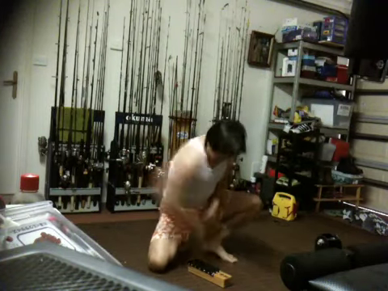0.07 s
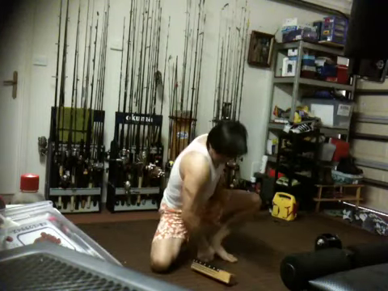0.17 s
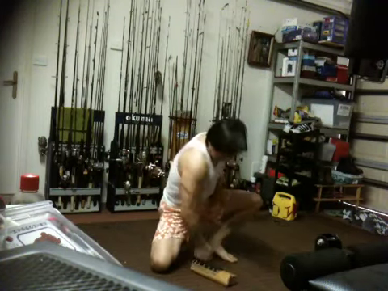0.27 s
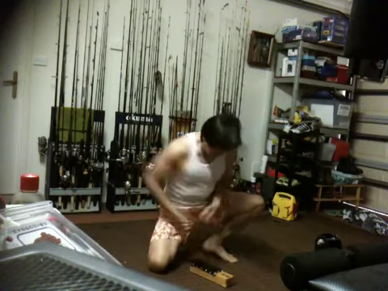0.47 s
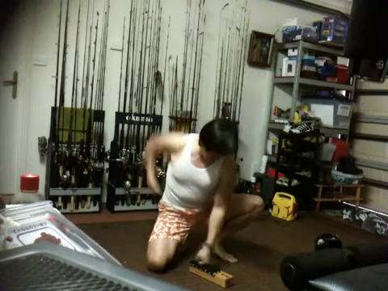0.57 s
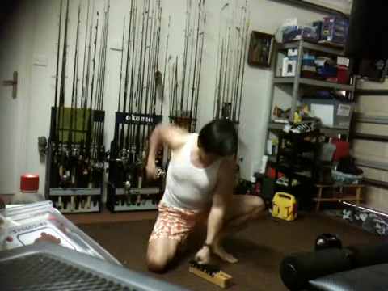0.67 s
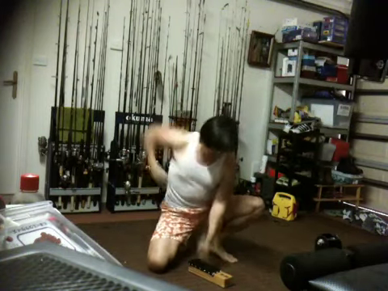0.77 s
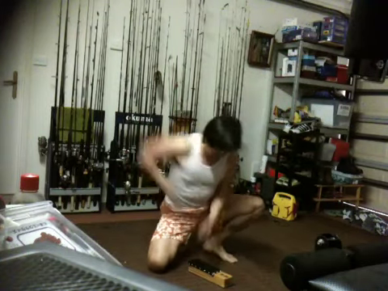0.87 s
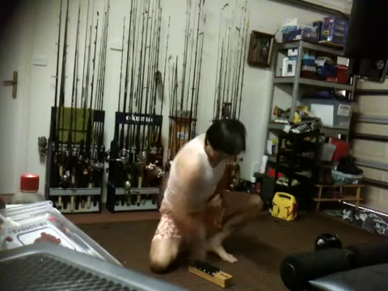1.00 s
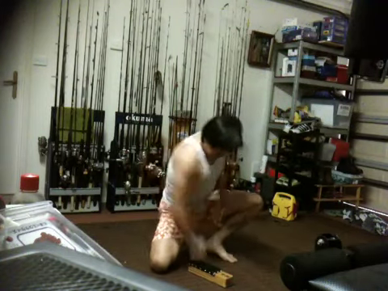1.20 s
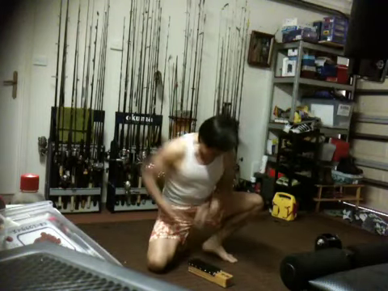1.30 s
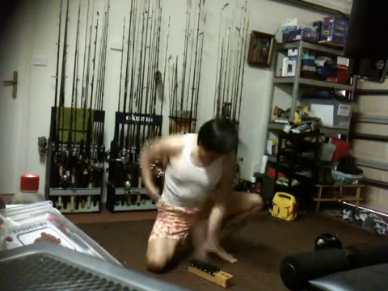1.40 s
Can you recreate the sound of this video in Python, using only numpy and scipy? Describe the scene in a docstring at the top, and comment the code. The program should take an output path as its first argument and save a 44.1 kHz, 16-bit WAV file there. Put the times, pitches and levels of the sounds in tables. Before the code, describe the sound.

An arm smacks a wooden block twice, with a duller thump between, in a small room.

```python
"""Strike training in a small, bare-walled storage room; one microphone, a few metres away.
At first an earlier blow is still dying away, under a soft bump of shifting weight. An arm swishes down
and smacks over a wooden block (0.23 s), is pulled back with a duller thump against the body (0.70 s),
then swishes down and smacks again (1.14 s). One more soft bump follows. The room rings after every
blow, over a faint, steady room noise."""
import sys
import numpy as np
from scipy import signal
from scipy.fft import rfft, irfft
from scipy.io import wavfile

SR = 44100
rng = np.random.default_rng(int(sys.argv[2]) if len(sys.argv) > 2 else 0)


def generate_wav(sig):
    """Save sig (samples, or channels by samples) to the path in sys.argv[1] as 16-bit PCM at SR."""
    pcm = np.round(np.clip(np.atleast_2d(sig).T, -1, 1) * 32767).astype(np.int16)
    wavfile.write(sys.argv[1], SR, pcm)


N = 63945

TOUCH_DECAY_S, SMACK_DECAY_S, TOUCH_DULL_HZ = 0.002913, 0.00233, 1500
BODY_WIDTH_HZ, HOLLOW_WIDTH_HZ, CRACK_WIDTH_HZ = 46, 106, 190
THUD_LAG_S = 0.0037
# Spectrum of smacking skin: f/Hz, level/dB
SMACK_SPECTRUM = [(30, -37), (90, -25.5), (165, -8), (215, -3), (265, -10.5), (400, -6.5), (600, -1),
                  (800, -1.5), (1300, -0.5), (1900, -1.5), (2450, -0.5), (3250, -4.5), (4200, -2),
                  (5700, -4.5), (7300, 0.5), (8500, -6.5), (11400, -16), (12800, -23), (16000, -42)]
# Blows over the block: touch t/s, level/dB; full contact t/s, level/dB; floor thud level/dB;
# then f/Hz, boost/dB for each of body note, hollow note and crack
STRIKE_EVENTS = [(0.2245, -8.5, 0.2298, 1, -24, 515, 4.5, 1036, 6.5, 4010, 5.5),
                 (1.1362, -8.5, 1.1437, -2.7, -36, 317, 6, 1600, 5.5, 4700, 6)]
def strikes():
    """Each strike touches first, lands flat with three resonances, then pushes into the floor."""
    out = np.zeros(N)
    for touch_s, touch_db, smack_s, smack_db, thud_db, *resonances in STRIKE_EVENTS:
        body_hz, body_db, hollow_hz, hollow_db, crack_hz, crack_db = resonances
        peaks = [(body_hz, BODY_WIDTH_HZ, body_db),
                 (hollow_hz, HOLLOW_WIDTH_HZ, hollow_db),
                 (crack_hz, CRACK_WIDTH_HZ, crack_db)]

        def colour(hz):
            """The smack's spectrum with this strike's resonances, in dB."""
            boost_db = sum(db / (1 + ((hz - f) / width) ** 2) for f, width, db in peaks)
            return read(SMACK_SPECTRUM, hz) + boost_db

        dull_click = pulse(lambda hz: colour(hz) - 10 * np.log10(1 + (hz / TOUCH_DULL_HZ) ** 2))
        touch = np.convolve(dull_click, contact(TOUCH_DECAY_S))
        add(out, touch_s, amp(touch_db) * room(touch, wet_db=-1.5))
        smack = np.convolve(pulse(colour), contact(SMACK_DECAY_S))
        add(out, smack_s, amp(smack_db) * room(smack))
        add(out, smack_s + THUD_LAG_S, amp(thud_db) * room(floor_thud(), wet_db=-10))
    return out


def floor_thud(hz=138, decay_s=0.004):
    """The low push of a blow sets the floor into a heavily damped swing."""
    t = np.arange(4096) / SR
    return unit(t * np.exp(-t / decay_s) * np.sin(2 * np.pi * hz * t))


THUMP_DECAY_S, EARLIER_BLOW_S, EARLIER_BLOW_DB = 0.0014, -0.23, -12
# Spectrum of the arm meeting the body: f/Hz, level/dB
THUMP_SPECTRUM = [(30, -24), (90, -24.5), (190, 0), (260, -3), (350, 4), (480, -3), (680, 0.5), (1200, -4),
                  (1700, -6), (2500, -8), (4000, -16.5), (8000, -13.5), (15000, -30)]
# Spectrum of the tick of skin that comes with it: f/Hz, level/dB
TICK_SPECTRUM = [(100, -27), (4300, -11), (5100, 1), (6500, 3), (7500, -5), (10000, -10), (13000, -23),
                 (16000, -35)]
# The arm pulled back: t/s, thump level/dB, tick level/dB
PULL_BACKS = [(0.7003, -11.5, -15)]
def body_thumps():
    """The arm comes back against the body with a dull thump and a sharp tick of skin."""
    out = np.zeros(N)
    for s, thump_db, tick_db in PULL_BACKS:
        add(out, s, amp(thump_db) * room(impact(THUMP_SPECTRUM, THUMP_DECAY_S)))
        tick = impact(TICK_SPECTRUM, decay_s=0.000381)
        add(out, s, amp(tick_db) * room(tick, wet_db=-6))
    earlier_blow = room(impact(THUMP_SPECTRUM, THUMP_DECAY_S))
    add(out, EARLIER_BLOW_S, amp(EARLIER_BLOW_DB) * earlier_blow)  # only its tail is heard
    return out


TAIL_DB, TAIL_START_S, TAIL_RISE_S, MODES_DB = 6, 0.00035, 0.0062, -21
# First reflections from floor and walls to the microphone: delay/s, level/dB
REFLECTIONS = [(.0019, -3.5), (.0062, -3.5), (.0075, -5.5), (0.0125, -7), (.0135, -13.5), (.018, -6.5)]
# Decay of the diffuse tail between the bare walls: f/Hz, t60/s
TAIL_DECAY = [(50, 0.3), (110, 0.49), (200, 0.45), (350, 0.61), (700, 0.54), (1400, 0.53), (2500, 0.56),
              (4500, .47), (7500, 0.46), (11000, 0.38), (16000, 0.18)]
# Ringing of the room and the things stored in it: f/Hz, level/dB relative to MODES_DB, t60/s
ROOM_MODES = [(207, 4, 0.19), (306, 2.5, .5), (392.4, -1, 0.46), (604, 2, 0.42), (876, -6, 0.66),
              (981, -6, 0.3), (1095, -5.5, 0.58), (1332, 5, 0.55), (1579, 6.5, 0.35), (1705, 1, 0.65),
              (2048, -8, 0.65), (3744, 9, 0.29), (4030, 6.5, 0.19), (7030, -18, .5)]
def room(sound, wet_db=0):
    """What reaches the microphone: direct sound, first reflections, a diffuse tail and ringing modes."""
    t = np.arange(SR) / SR
    hz, frame_s, spectra = signal.stft(rng.standard_normal(SR), SR, nperseg=512)
    decay = amp(-60 * frame_s / read(TAIL_DECAY, hz)[:, None])
    tail = signal.istft(spectra * decay, SR, nperseg=512)[1][:SR]
    swell = np.clip((t - TAIL_START_S) / TAIL_RISE_S, 0, 1)
    response = amp(TAIL_DB) * unit(tail * swell)
    for (f, db, t60), phase in zip(ROOM_MODES, rng.random(len(ROOM_MODES))):
        ring = amp(-60 * t / t60) * np.sin(2 * np.pi * (f * t + phase))
        response += amp(MODES_DB + db) * unit(swell * ring)
    for delay, db in REFLECTIONS:
        add(response, delay, amp(db) * contact(decay_s=0.0003))
    response *= amp(wet_db)
    response[0] += 1  # direct sound
    return signal.fftconvolve(sound, response)


# Spectrum of a soft knock on the carpet: f/Hz, level/dB
BUMP_SPECTRUM = [(30, -23), (110, -12), (170, -7), (250, -5), (330, 6.5), (450, -9), (1000, -20),
                 (4000, -31), (16000, -58)]
# Shifts of the body's weight: t/s, level/dB
WEIGHT_SHIFTS = [(0.015, -40), (1.322, -34)]
def carpet_bumps():
    """A knee or foot knocks faintly on the carpet as the weight shifts."""
    out = np.zeros(N)
    for s, db in WEIGHT_SHIFTS:
        add(out, s, amp(db) * room(impact(BUMP_SPECTRUM, decay_s=0.0015), wet_db=-8))
    return out


# Spectrum of moving cloth: f/Hz, level/dB
SWISH_SPECTRUM = [(100, -15), (600, -8), (2000, -4.5), (4000, -3), (7000, -0.5), (9500, -7), (15000, -20)]
# Swings of the arm: fastest moment t/s, half length/s, level/dB
SWINGS = [(0, 0.043, -68), (0.207, 0.07, -67), (0.613, 0.037, -74), (1.051, 0.044, -66)]
def swishes():
    """Arm and clothes sweep through the air: a soft hiss that swells with each swing."""
    t = np.arange(N) / SR
    swell = sum(amp(db) * np.exp(-0.5 * ((t - s) / half_s) ** 2) for s, half_s, db in SWINGS)
    return noise(SWISH_SPECTRUM) * swell


# Spectrum of the quiet room at the microphone: f/Hz, level/dB
ROOM_TONE_SPECTRUM = [(25, -28), (60, -12), (100, 4.5), (170, 8), (350, 2), (700, -2), (1500, -3.5),
                      (3500, -16), (7000, -11), (10000, -10.5), (15500, -16), (16500, -32)]
def room_tone(level_db=-71):
    """Faint, steady noise, strongest in the low range."""
    return amp(level_db) * noise(ROOM_TONE_SPECTRUM)


def impact(spectrum, decay_s):
    """A click of the given spectrum, spread over a brief contact."""
    return np.convolve(pulse(lambda hz: read(spectrum, hz)), contact(decay_s))


def contact(decay_s, size=1024, passes=8):
    """A brief burst of even spectrum: skin meets its target over a few milliseconds."""
    fade = np.exp(-np.arange(size) / SR / decay_s)
    burst = rng.standard_normal(size) * fade
    for _ in range(passes):
        spectrum = rfft(burst * np.minimum(3 * fade, 1))  # keep it short
        burst = irfft(spectrum / (abs(spectrum) + 1e-12))  # flatten its spectrum
    return unit(burst)


def pulse(colour_db, size=4096):
    """A causal click of unit energy whose spectrum is the function colour_db."""
    hz = abs(np.fft.fftfreq(size, 1 / SR))
    log_gain = np.log(amp(colour_db(hz)))
    minimum_phase = np.exp(np.conj(signal.hilbert(log_gain)))
    return unit(np.fft.ifft(minimum_phase).real)


def noise(spectrum):
    """Steady noise of rms one with the given spectrum."""
    gain = amp(read(spectrum, np.fft.rfftfreq(N, 1 / SR)))
    return unit(irfft(rfft(rng.standard_normal(N)) * gain, N)) * np.sqrt(N)


def amp(db):
    """Decibels to gain."""
    return 10 ** (np.asarray(db) / 20)


def read(points, hz):
    """Reads a table on a log-frequency axis."""
    f, value = np.transpose(points)
    return np.interp(np.log(hz + 1), np.log(f + 1), value)


def unit(x):
    """Scales a sound to an energy of one."""
    return x / np.sqrt(np.sum(x ** 2) + 1e-20)


def add(mix, s, sound):
    """Mixes a sound in at time s, which may lie before the start."""
    at = round(s * SR)
    sound = sound[max(-at, 0):]
    part = mix[max(at, 0):][:len(sound)]
    part += sound[:len(part)]


def scene():
    """Blows and swings over the quiet room, in mono from a few metres away."""
    return (strikes() + body_thumps() + carpet_bumps() + swishes() + room_tone())[None]


def record(dry):
    """The recorder's band limit cuts the highest treble."""
    lowpass = signal.firwin(511, cutoff=16100, window=("kaiser", 9), fs=SR)
    return signal.oaconvolve(dry, lowpass[None], "same")


dry = scene()
out = record(dry)
generate_wav(out)
```